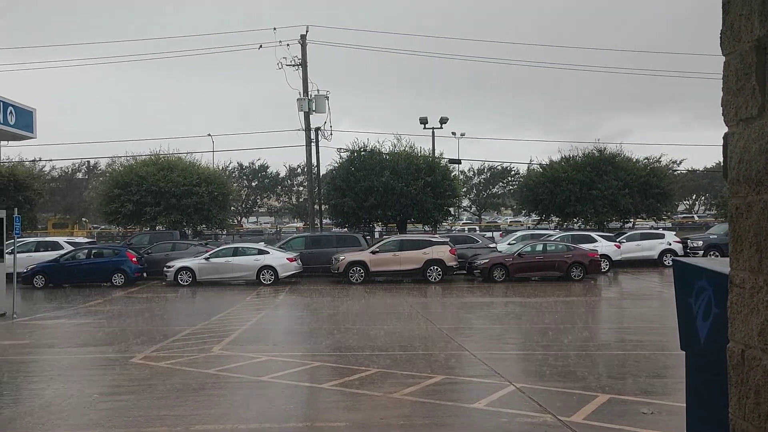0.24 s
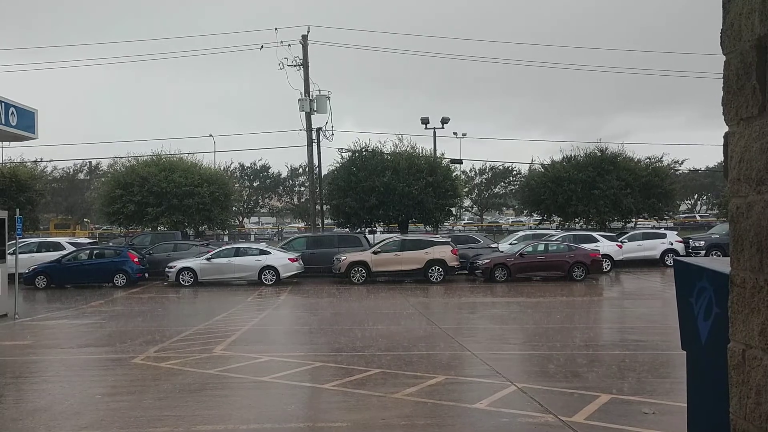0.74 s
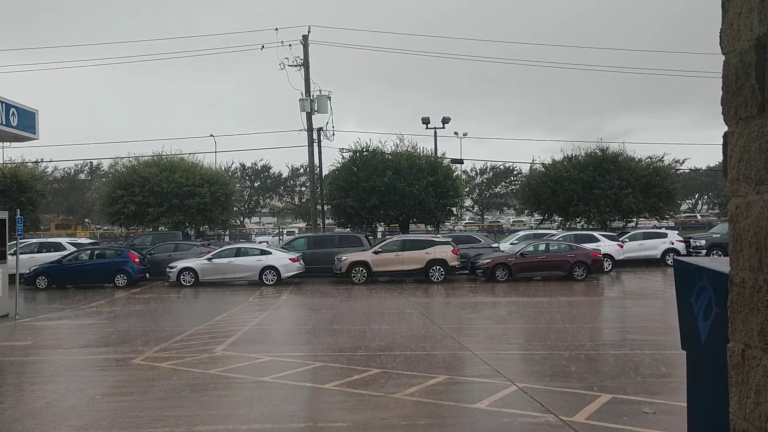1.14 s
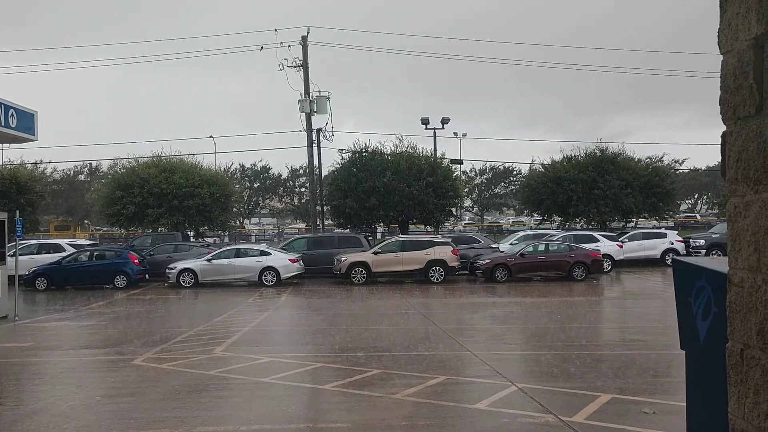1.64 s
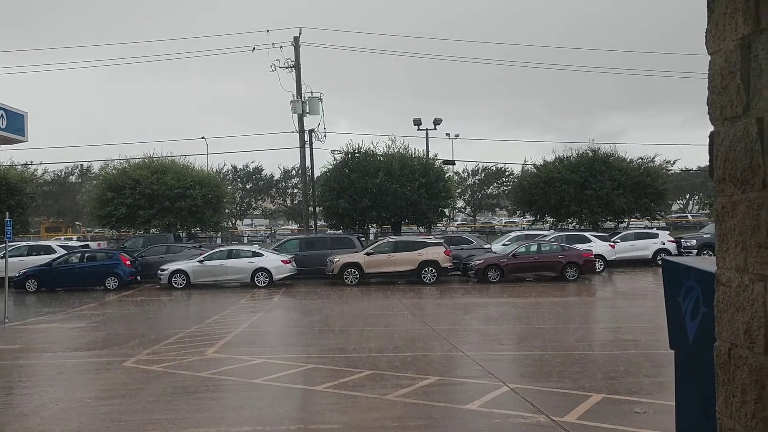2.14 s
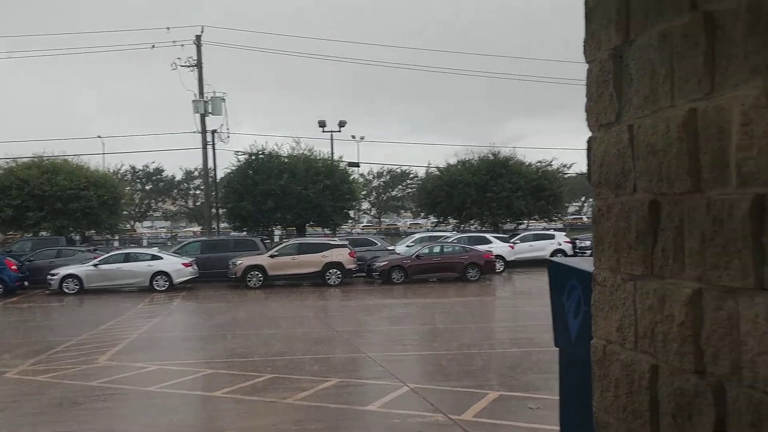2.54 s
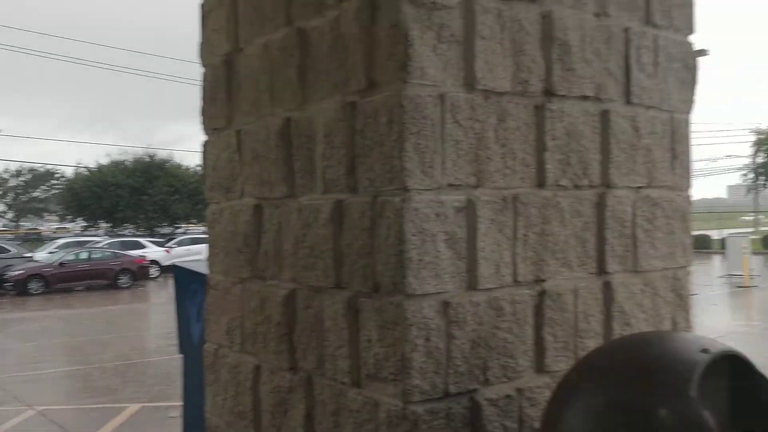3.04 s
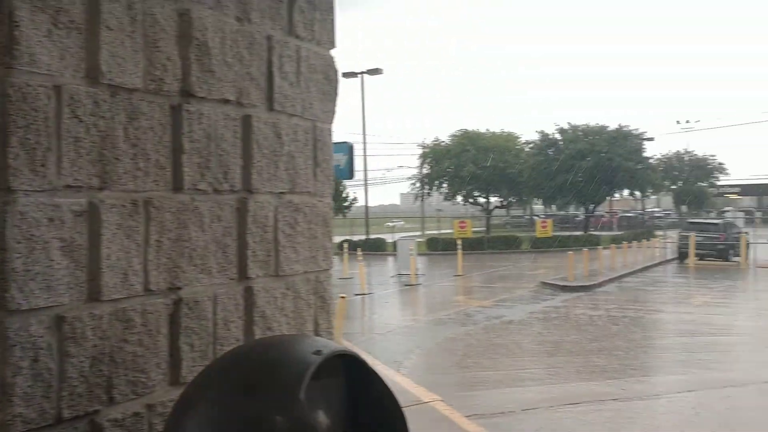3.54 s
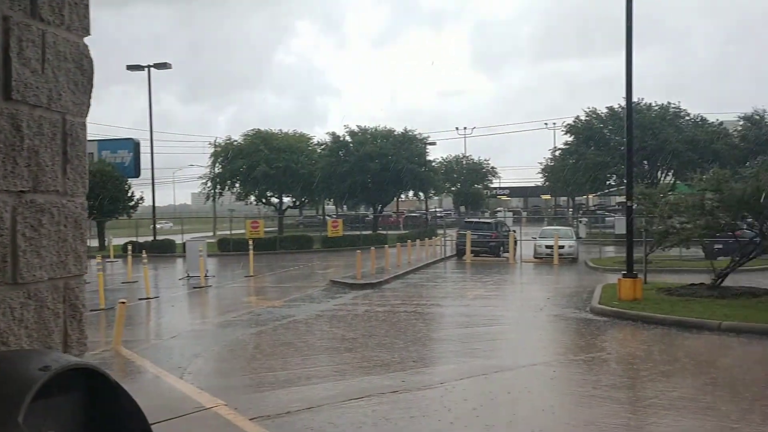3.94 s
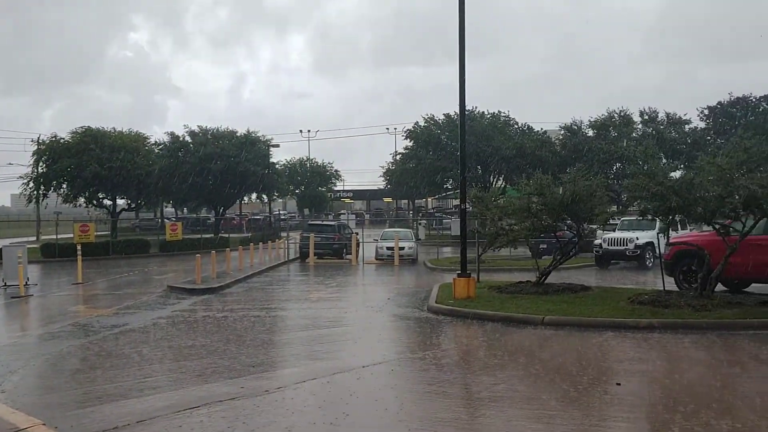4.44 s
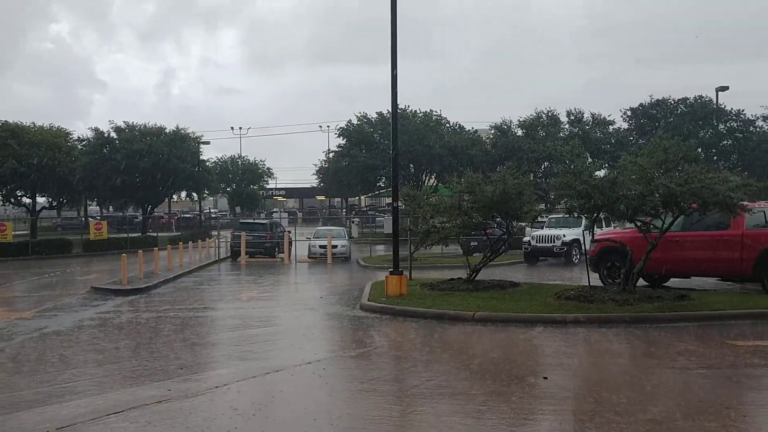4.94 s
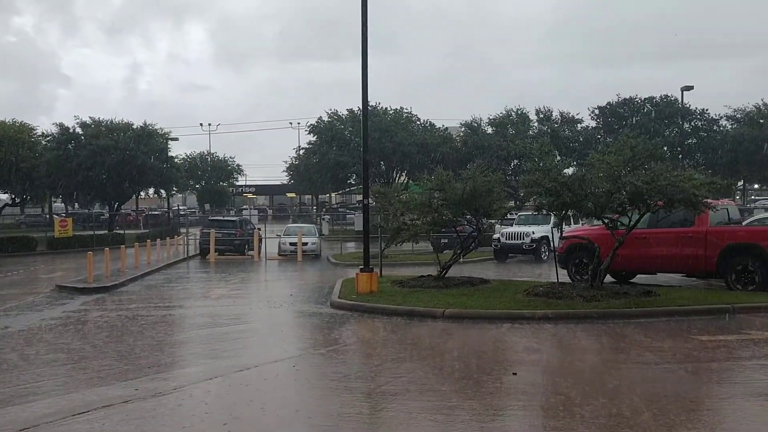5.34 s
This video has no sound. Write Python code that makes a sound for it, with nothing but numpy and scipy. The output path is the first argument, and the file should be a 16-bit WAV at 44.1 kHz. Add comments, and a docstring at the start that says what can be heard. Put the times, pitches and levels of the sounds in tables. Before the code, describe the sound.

Rain on an open parking lot: a crisp, grainy hiss, close drops cracking, puddle splatter, faint traffic murmur and wind buffeting the microphone.

```python
"""Rain on a wet parking lot, heard on two microphone ports beside a brick pillar as the microphone turns.
From the start: ticking drops over a wash of noise, runoff slapping into a puddle and pattering on concrete
at right, a traffic murmur far off, and gusts of low noise that thump and ruffle the left port.
Soon drops shatter, bubbles ring, large drops crack close by and gushes slap the ground. The early rain
comes in even waves; after about three seconds ticks stand out, the hiss brightens and the whirrs fade."""
import sys
import numpy as np
from scipy import signal
from scipy.fft import rfft, irfft
from scipy.io import wavfile
from scipy.ndimage import uniform_filter1d

SR = 44100
rng = np.random.default_rng(int(sys.argv[2]) if len(sys.argv) > 2 else 0)


def generate_wav(signal):
    """Clip the signal to [-1, 1] and save it as 16-bit WAV at the path in sys.argv[1]."""
    frames = np.transpose(np.atleast_2d(signal))
    scaled = np.clip(frames, -1, 1) * 32767
    pcm = np.round(scaled).astype(np.int16)
    wavfile.write(sys.argv[1], SR, pcm)


N = 246519
TIME = np.arange(N) / SR


def amp(db):
    """Amplitude ratio of a level in dB."""
    return 10 ** (np.asarray(db) / 20)


def unit(x):
    """Scales a sound to rms 1."""
    return x / np.sqrt(np.mean(x ** 2) + 1e-20)


def curve(rows):
    """A table of (time, value) rows, joined by straight lines at every sample."""
    return np.interp(TIME, *np.transpose(rows))


def read(points, hz):
    """A spectrum, joined by straight lines on a log-frequency axis."""
    f, db = np.transpose(points)
    return np.interp(np.log(hz + 1), np.log(f), db)


def colour(x, points, size=4096):
    """Causal minimum-phase filter with the given spectrum, so that clicks keep their sharp front."""
    log_gain = np.log(amp(read(points, abs(np.fft.fftfreq(size, 1 / SR)))))
    response = np.exp(np.conj(signal.hilbert(log_gain)))
    taps = np.fft.ifft(response).real
    return signal.oaconvolve(x, taps[:size // 2])[:N]


def band(hz, width_hz):
    """Noise of rms 1 in a bell-shaped band; around 0 Hz it is a slow random drift."""
    f = np.fft.rfftfreq(N, 1 / SR)
    bell = np.exp(-2 * ((f - hz) / width_hz) ** 2)
    return unit(irfft(rfft(rng.standard_normal(N)) * bell, N))


def impacts(per_s, spread_db, limit_db):
    """Random clicks of either sign: many small, a few large."""
    size = amp(np.minimum(spread_db * rng.exponential(1, N), limit_db))
    sign = rng.choice([-1, 1], N)
    return size * sign * (rng.random(N) < per_s / SR)


def tick(hz, cycles, size=96):
    """The sub-millisecond pressure ring of a drop bursting on wet ground."""
    turns = hz * np.arange(size) / SR
    ring = np.sin(2 * np.pi * turns) * turns * np.exp(-turns / cycles)
    return ring / np.linalg.norm(ring)


def add(mix, s, sound):
    """Lays a short two-sided sound into the mix at s seconds."""
    part = mix[:, max(round(s * SR), 0):][:, :sound.shape[1]]
    part += sound[:, :part.shape[1]]


def spray(clicks, t60, size=4000):
    """Each impact starts a fizz of droplets and wall reflections, down 60 dB after t60 seconds."""
    decay = np.exp(-2 * np.log(1000) * np.arange(size) / SR / t60)
    power = signal.oaconvolve(clicks ** 2, decay / decay.sum())[:N]
    return np.sqrt(abs(power)) * rng.standard_normal(N)


def steadied(x, size=1500):
    """Evens out the level over a few hundredths of a second, leaving the fine grain."""
    return x / np.sqrt(abs(uniform_filter1d(x ** 2, size)) + 1e-12)


def patchy(x, depth_db, length_s, width_hz, ceiling=1.24, size=1024):
    """Lets neighbouring pitches swell and fade on their own, in short random patches."""
    z = signal.stft(x, nperseg=size, noverlap=size * 3 // 4)[2]
    # a random field over pitch and time, smoothed along both
    rate = np.fft.fftfreq(z.shape[1], size / 4 / SR)
    ripple = np.fft.fftfreq(z.shape[0], SR / size)[:, None]
    smooth = np.exp(-2 * ((rate * length_s) ** 2 + (ripple * width_hz) ** 2))
    field = unit(np.fft.ifft2(np.fft.fft2(rng.standard_normal(z.shape)) * smooth).real)
    # the ceiling makes the fades deeper than the swells
    z = z * unit(amp(depth_db * np.minimum(field, ceiling)))
    return signal.istft(z, nperseg=size, noverlap=size * 3 // 4)[1][:N]


WAVE_CREST_S, WAVE_PERIOD_S = .68, .372
WAVES_END_S, WAVES_FADE_S = 2.5, 0.23


def waves():
    """Sheets of rain come and go between -1 and 1, then even out."""
    swing = np.cos(2 * np.pi * (TIME - WAVE_CREST_S) / WAVE_PERIOD_S)
    return swing * np.clip((WAVES_END_S - TIME) / WAVES_FADE_S, 0, 1)


# colour of the rain on the left port: frequency_hz, relative_level_db
RAIN_COLOUR_LEFT = [(1000, -86), (4200, -32), (4900, -45), (5500, -39), (6300, -27), (8000, -1.5),
                    (10000, 2), (12500, 0), (15500, -7)]
# colour of the rain on the right port: frequency_hz, relative_level_db
RAIN_COLOUR_RIGHT = [(1000, -29.5), (2800, -77), (4700, -43), (5550, -17.5), (6300, -10), (8000, -5),
                     (10000, -0.5), (12500, -1), (15500, -2)]
# the rain grows louder as the microphone turns: time_s, relative_level_db
RAIN_LEVEL = [(0, -27), (.47, -26.5), (.56, -27.5), (.66, -26), (1.25, -26), (2.02, -25), (2.18, -25),
              (2.3, -26), (2.38, -23.5), (2.65, -22.5), (2.85, -24), (3.34, -23.5), (3.41, -25.5),
              (3.55, -24.5), (4.1, -22.5), (4.55, -22.5), (5.0, -24.5), (5.38, -22.5), (5.59, -23.5)]
WAVE_RAIN_DB = 0.35  # swing of the waves either way


def rain(spectrum, level_db, count=16):
    """Separate ticks from nearby pavement over the smooth wash of the far lot."""
    flurry = amp(.7 * band(0, 22))
    drops_per_s = 230 * flurry  # at each pitch
    ticks = np.zeros(N)
    for hz in np.geomspace(5500, 16500, count):
        clicks = impacts(drops_per_s, spread_db=4.2, limit_db=16)
        ticks += np.convolve(clicks, tick(hz, cycles=.6))[:N]
    ticks = unit(ticks)
    # the turn brings closer pavement into earshot, so single ticks stand out more
    near_share = np.interp(TIME, [2, 3.5], [.27, .4])
    wash = unit(spray(ticks, t60=.03) + flurry * rng.standard_normal(N))
    sound = np.sqrt(near_share) * ticks + np.sqrt(1 - near_share) * wash
    sound = patchy(colour(sound, spectrum), depth_db=1.8, length_s=.025, width_hz=420)
    return unit(sound) * amp(curve(RAIN_LEVEL) + WAVE_RAIN_DB * waves() + level_db)


def turned(x):
    """Facing the open lot after the turn, the top of the hiss is brighter."""
    top = signal.sosfilt(signal.butter(1, 11000, "high", fs=SR, output="sos"), x)
    shade_db = np.interp(TIME, [2.7, 3.5], [-2.5, 1.2])
    brightened = x + (amp(shade_db) - 1) * top
    return brightened * amp(-.55 * shade_db)  # offsets the change in level


# colour of the splatter on the left port: frequency_hz, relative_level_db
SPLATTER_LEFT = [(1000, -46), (3000, -20), (4200, -18.5), (5200, -8), (5650, -2), (6200, 9.5), (7000, 5),
                 (9000, -7), (12000, -21)]
# colour of the splatter on the right port: frequency_hz, relative_level_db
SPLATTER_RIGHT = [(1000, -33), (2300, -14), (2900, -15), (3180, -0.5), (3420, -3), (3750, 3.5),
                  (4300, -0.5), (4750, -3), (5250, 6.5), (5580, -6), (6200, -2.5), (7000, 2.5), (8000, 0),
                  (12000, -4)]
# flow of the runoff into the puddle on the right: time_s, relative_level_db
RUNOFF_LEVEL = [(0, -44.5), (.07, -44.5), (.55, -42), (.88, -39), (1.2, -47), (1.4, -44.5), (1.62, -44),
                (1.74, -39), (2.05, -45), (2.33, -42), (2.45, -38), (2.62, -40), (2.8, -39), (3.02, -43.5),
                (3.35, -47), (3.58, -54.5), (3.8, -46), (4.05, -47.5), (4.38, -53.5), (4.6, -48),
                (5.1, -56.5), (5.43, -44.5), (5.59, -54)]


def splatter(spectrum, flow_db, count=60):
    """A dense stream of small slaps on a puddle, with bubbles ringing at many pitches."""
    t = np.arange(SR // 12) / SR
    bubbles = np.zeros(N)
    for hz in np.geomspace(2700, 7800, count):
        ring = np.sin(2 * np.pi * hz * t * (1 + .1 * t)) * np.exp(-hz * t / 20)
        bubbles += signal.oaconvolve(impacts(24, spread_db=4, limit_db=10), ring)[:N]
    slaps = impacts(600, spread_db=5, limit_db=14)
    sound = .35 * unit(bubbles) + unit(slaps) + .5 * unit(spray(slaps, t60=.012))
    sound = patchy(sound, depth_db=5, length_s=.04, width_hz=200, ceiling=1.2)
    return steadied(colour(sound, spectrum)) * amp(flow_db)


# colour of the thin spatter of runoff on bare concrete: frequency_hz, relative_level_db
SPATTER_COLOUR = [(2500, -45), (4000, -15), (4700, -9), (5150, 0), (5550, -5), (6000, 2.5), (6600, -3),
                  (7500, -13), (10000, -29)]
# level of that spatter on the right: time_s, level_db
SPATTER_LEVEL = [(0, -56), (.07, -39.5), (.6, -39.5), (.95, -53), (1.4, -72), (1.75, -51), (2.05, -59),
                 (2.17, -36.5), (2.32, -41), (2.45, -34), (2.92, -35), (3.08, -40.5), (3.4, -35.5),
                 (3.58, -48), (3.95, -42), (4.2, -42), (4.6, -56), (5.25, -45.5), (5.5, -61)]


def spatter():
    """Part of the runoff misses the puddle and patters thinly on concrete, louder on the right."""
    slaps = impacts(1200, spread_db=4, limit_db=12)
    sound = unit(slaps) + .6 * unit(spray(slaps, t60=.012))
    right = steadied(colour(sound, SPATTER_COLOUR))
    left = amp(-20) * np.roll(right, SR // 50)  # arrives late, off the wall
    return np.array([left, right]) * amp(curve(SPATTER_LEVEL))


def uneven_below(x, edge_hz=6600):
    """Makes all the water noise below 6.6 kHz uneven, in narrow random patches."""
    low = signal.oaconvolve(x, signal.firwin(61, edge_hz, fs=SR), "same")
    return x - low + patchy(low, depth_db=12, length_s=.075, width_hz=145, ceiling=.75)


# distant traffic on the left port: frequency_hz, relative_level_db (per Hz)
TRAFFIC_LEFT = [(30, -70), (110, -102), (250, -68), (400, -82), (520, -88.5), (700, -72.5), (930, -82.5),
                (1050, -83), (1200, -89.5), (1500, -93), (2400, -88.5), (2700, -80), (3200, -99),
                (8000, -102)]
# distant traffic on the right port: frequency_hz, relative_level_db (per Hz)
TRAFFIC_RIGHT = [(30, -100), (100, -71), (240, -79.5), (340, -83), (430, -70), (530, -81), (620, -80),
                 (740, -69.5), (880, -69.5), (1020, -92), (1280, -83.5), (1500, -89), (2100, -92),
                 (8000, -102)]
# the traffic swells and recedes: time_s, relative_level_db
TRAFFIC_LEVEL = [(0, -0.5), (.9, 4), (3.7, 3.5), (5.59, 2)]
# narrow whirring resonances in the traffic noise, before dips and fade: pitch_hz, width_hz, left_db, right_db
WHIRRS = [(1778, 86, -102, -59.5), (2640, 78, -93, -66.5)]
# faint low drones that come and go: start_s, length_s, pitch_hz, width_hz, level_db
DRONES = [(3.811, 0.12, 430, 130, -42), (3.917, 0.31, 378, 187, -42.5), (4.28, 0.51, 308, 128, -44.5),
          (5.246, 0.24, 605, 45.5, -48.5)]
WHIRR_DIP_DB = 7.5  # per unit of a random drift


def traffic():
    """A dull, shifting noise murmur, partly alike in both ports, with whirring resonances and drones."""
    shared_colour = [(150, -13.5), (350, 9.5), (600, -6.5), (1000, -4.5), (3000, -51.0)]
    shared = colour(rng.standard_normal(N), shared_colour)
    sides = []
    for spectrum in (TRAFFIC_LEFT, TRAFFIC_RIGHT):
        murmur = colour(1.72 * shared + rng.standard_normal(N), spectrum)
        sides.append(patchy(murmur, depth_db=8.0, length_s=0.046, width_hz=159, ceiling=1.55))
    # the square root turns dB per Hz into the level of sampled noise
    out = np.array(sides) * np.sqrt(SR / 2) * amp(curve(TRAFFIC_LEVEL) - 8.5)
    # the whirrs fade as the microphone turns away
    facing = amp(np.interp(TIME, [2.8, 4.2], [0, -3.2]))
    for hz, width_hz, left_db, right_db in WHIRRS:
        whirr = amp([[left_db], [right_db]]) * band(hz, width_hz)
        dips = amp(WHIRR_DIP_DB * np.minimum(band(0, 8.6), .3))
        out += whirr * dips * facing
    for s, length, hz, width_hz, db in DRONES:
        swell = np.sin(np.pi * np.clip((TIME - s) / length, 0, 1))
        out += amp(db) * band(hz, width_hz) * swell
    return out


# gusts of wind on the two ports: start_s, length_s, relative_left_db, relative_right_db
GUSTS = [(0.034, 0.16, -36, -77), (0.41, 0.072, -43, -62), (0.61, 0.012, -38.5, -60),
         (0.723, 0.023, -40, -76), (0.816, 0.028, -37.5, -77), (1.22, 0.27, -35, -74),
         (1.623, 0.03, -27, -49), (1.877, 0.13, -33.5, -69), (2.11, 0.11, -28, -66), (2.4, 0.23, -37, -73),
         (3.191, 0.33, -34.5, -57), (3.487, 0.21, -38, -37.5), (3.856, 0.36, -46, -50.5),
         (4.466, 0.15, -40, -50), (4.758, 0.28, -39.5, -52), (5.143, 0.083, -34, -42.5),
         (5.432, 0.1, -28, -53)]
GUST_RISE_S, GUST_RELEASE_S = 0.029, 0.079  # time constants
GUST_SAG_DB_PER_S = 1
BREEZE_DB = (-56.5, -84)  # relative level between gusts: left, right
# turbulence around each thump: left and right against its tabled peak, and its half-length
WAKE_DB, WAKE_S = (-11.5, -54), 0.0088


def pressure_db(port):
    """Each gust rises quickly, sags and dies back into the breeze; eddies add brief peaks."""
    power = amp(BREEZE_DB[port]) ** 2
    for s, length, *sides_db in GUSTS:
        age = TIME - s
        rise = np.minimum(age, 0) / GUST_RISE_S
        release = np.maximum(age - length, 0) / GUST_RELEASE_S
        gate = np.exp(rise - release)
        sag_db = GUST_SAG_DB_PER_S * np.maximum(age, 0)
        power = power + (gate * amp(sides_db[port] - sag_db)) ** 2
    for s, db in THUMPS:
        wake = np.exp(-((TIME - s) / WAKE_S) ** 2)
        power = power + amp(db + WAKE_DB[port]) ** 2 * wake
    return 10 * np.log10(power)


# colour of the buffeting: frequency_hz, relative_level_db
BUFFET_COLOUR = [(20, -37), (40, -42), (65, 3), (110, 9.5), (170, 3.5), (250, -1), (380, -10.5), (520, -33),
                 (800, -32), (1300, -44.5), (3000, -62)]


def buffet(force_db, level_db, lump_db):
    """Turbulence rumbles on a port: lumpy noise, mostly low, that follows the wind's force."""
    swirl = colour(rng.standard_normal(N) * amp(lump_db * band(0, 36)), BUFFET_COLOUR)
    # the gust sets the overall force; the swirl only varies it from eddy to eddy
    return steadied(swirl, size=2000) * amp(force_db + level_db)


# single eddies that thump on the left port, before a common trim: time_s, peak_db
THUMPS = [(0.068, -16), (0.113, -16.5), (0.166, -18), (0.601, -19), (1.227, -17.5), (1.259, -16.5),
          (1.451, -16), (1.591, -13), (1.648, -18), (1.671, -14), (1.749, -17.5), (1.841, -14),
          (2.075, -16.5), (2.147, -14.5), (2.216, -25), (2.432, -15), (5.171, -21), (5.462, -20.5)]


def thumps():
    """An eddy that hits the port squarely gives one fast-dying push and pull of pressure."""
    out, t = np.zeros((2, N)), np.arange(SR // 25) / SR
    for (s, db), (speed, side) in zip(THUMPS, rng.random((len(THUMPS), 2))):
        turns = (140 + 90 * speed) * t
        push = np.sign(side - .5) * np.sin(2 * np.pi * turns) * turns * np.exp(-turns / 0.58)
        # starts early, so that the push peaks near the listed time
        add(out, s - .004, amp([[db], [db - 44]]) * push / abs(push).max())
    return amp(-3.0) * out


# drops that shatter into a cluster of ticks: start_s, length_s, pitch_hz, relative_left_db, relative_right_db
SPLASHES = [(0.065, .008, 7340, -42, -24.5), (0.676, 0.011, 10800, -23, -18),
            (1.384, 0.0073, 7600, -46, -26), (1.643, .01, 7950, -41, -28), (2.672, 0.0079, 8500, -30, -20),
            (2.926, 0.0074, 7200, -42, -23), (3.506, 0.014, 7400, -42, -24),
            (3.642, 0.016, 7300, -30, -24.5), (3.86, 0.011, 7400, -29, -33),
            (4.089, 0.015, 7440, -33, -23.5), (4.132, 0.011, 7600, -33, -22),
            (4.175, 0.013, 8000, -29, -30), (4.223, 0.013, 6370, -37, -27),
            (4.434, 0.017, 7140, -33, -25.5), (4.54, 0.0088, 7400, -33, -27),
            (4.772, 0.014, 9800, -23, -19), (5.244, 0.011, 8000, -28, -30), (5.48, 0.015, 7200, -28, -24)]
SPLASH_WIDTH = 0.33  # width of a splash's band against its pitch


def splashes():
    """A drop shatters, and its fragments land as a quick cluster of clicks in a bell-shaped band."""
    out, t = np.zeros((2, N)), np.arange(SR // 12) / SR
    f = np.fft.rfftfreq(len(t), 1 / SR)
    for s, length, hz, *sides_db in SPLASHES:
        age = t / (length / 2)
        swell = age * np.exp(1 - age)
        landed = rng.random((2, len(t))) < 9000 / SR
        fragments = rng.standard_normal((2, len(t))) * landed
        bell = np.exp(-2 * ((f - hz) / (SPLASH_WIDTH * hz)) ** 2)
        cluster = irfft(rfft(fragments * swell) * bell, len(t))
        cluster *= np.linalg.norm(swell) / np.linalg.norm(cluster, axis=1, keepdims=True)
        add(out, s, amp(sides_db)[:, None] * cluster)
    return out * amp(-4)


# brief, brighter flutters of hard wind: centre_s, half_length_s, level_db
FLUTTERS = [(0.119, 0.023, -29.5), (0.163, 0.011, -43), (1.44, 0.023, -33), (1.599, 0.018, -29.5),
            (1.647, 0.023, -28), (2.152, 0.019, -31), (2.23, 0.022, -30.5), (3.209, 0.053, -40),
            (3.33, 0.032, -37.5), (5.545, 0.007, -34)]
# colour of that flutter: frequency_hz, relative_level_db
FLUTTER_COLOUR = [(60, -28), (200, -13.5), (300, 15), (430, -1.5), (560, -7), (850, -13), (1300, -22),
                  (3000, -75)]


def flutter():
    """Hard gusts break into a brief, brighter ruffle of noise on the left port."""
    force = sum(amp(db) * np.exp(-((TIME - s) / length) ** 2) for s, length, db in FLUTTERS)
    ruffle = steadied(colour(rng.standard_normal(N), FLUTTER_COLOUR), size=900)
    return np.array([force * ruffle, np.zeros(N)])


# larger drips that ring a bubble in the puddle: start_s, pitch_hz, peak_db, glide_hz_per_s
PLIPS = [(0.156, 3120, -47, 500), (0.552, 3200, -47, -2000), (1.032, 3130, -47, 0),
         (4.439, 3200, -42, -3000), (5.019, 3150, -49, -9000)]


def plips():
    """A drip traps a wobbling bubble that rings softly under the rain, on the right."""
    out, t = np.zeros((2, N)), np.arange(SR // 6) / SR
    for s, hz, db, glide in PLIPS:
        age = t / .014
        wobble = 1 + .04 * band(0, 1400)[:len(t)]
        turns = np.cumsum((hz + glide * t) * wobble) / SR
        ring = age * np.exp(1 - age) * np.sin(2 * np.pi * turns)
        add(out, s, amp([[db - 28], [db]]) * ring)
    return out


# large drops that land close by, before colour and trim: time_s, peak_db, left_minus_right_db, pitch_hz
NEAR_DROPS = [(.189, -9, -9, 12400), (.26, -10, -16, 10000), (.33, -10, -12, 10700), (.628, -8, -9, 8000),
              (.731, -8, -9, 10300), (.795, -11, -12, 9900), (1.545, -10, -11, 11400),
              (1.818, -11, -11, 11500), (2.159, -6, -10, 9900), (2.228, -10, -12, 9500),
              (2.439, -7.5, -12, 8100), (2.662, -6, 0, 10900), (2.926, -7, -14, 8500),
              (3.005, -7, -13, 13400), (3.091, -4, -14, 12800), (3.113, -5, -11, 10900),
              (3.346, -8, -13, 12000), (3.361, -8, -10, 11300), (3.573, -4, -9, 11700),
              (3.694, -7, -11, 12800), (3.952, -5, -12, 12200), (4.016, -5, -8, 10100),
              (4.072, -3, -13, 11900), (4.106, -7, -9, 11200), (4.137, -7, -13, 11500),
              (4.186, -4, -3, 8500), (4.221, -8, -7, 10000), (4.291, -5, -6, 12200), (4.471, -6, -7, 11500),
              (4.49, -6, -13, 12400), (4.544, -7, -9, 9600), (4.717, -4, -7, 13100),
              (4.827, -4, -15, 11300), (5.05, -4, -12, 12500), (5.057, -5, -10, 11900),
              (5.306, -6, -13, 11900), (5.358, -5, -6, 10300)]
# colour of a large drop's crack: frequency_hz, relative_level_db
CRACK_COLOUR = [(1500, -60), (3500, -44), (5000, -22), (6500, -6), (8000, 0), (15000, 0)]
NEAR_DB = -1.3  # common trim
# droplets thrown up by a large drop: level against its peak, time constant of their decay
DROPLETS_DB, DROPLETS_S = -22, .006


def near_drops():
    """Single large drops, each with a pitch of its own and a brief fizz of droplets."""
    out, t = np.zeros((2, N)), np.arange(SR // 25) / SR
    for s, db, pan_db, hz in NEAR_DROPS:
        ring = tick(hz, cycles=.9)
        fizz = signal.lfilter(ring, 1, rng.standard_normal((2, len(t))))
        droplets = fizz * np.exp(-t / DROPLETS_S)
        # only the farther side is turned down
        sides = amp(db + np.array([[min(pan_db, 0)], [min(-pan_db, 0)]]))
        add(out, s, sides * ring / abs(ring).max())
        add(out, s, sides * amp(DROPLETS_DB) * droplets)
    return amp(NEAR_DB) * np.array([colour(side, CRACK_COLOUR) for side in out])


# heavier gushes of runoff hitting the ground: start_s, length_s, left_db, right_db
GUSHES = [(0.612, 0.073, -51, -31.5), (2.137, 0.14, -56, -37.5), (2.42, 0.076, -49, -28),
          (3.128, 0.053, -39, -39), (3.38, 0.043, -34, -31.5), (4.203, 0.033, -49, -41),
          (4.766, 0.046, -47, -32.5)]
# colour of a gush: frequency_hz, relative_level_db
GUSH_COLOUR = [(1500, -50), (2700, -28), (3200, -9), (4500, -1.5), (5500, 0), (7000, 2), (9000, -4),
               (14000, -29)]


def gushes():
    """A lump of water breaks into a quick cluster of wet slaps."""
    swell = np.zeros((2, N))
    for s, length, left_db, right_db in GUSHES:
        age = np.maximum(TIME - s, 0) / (length / 3)
        swell += amp([[left_db], [right_db]]) * age * np.exp(1 - age)
    slaps = [colour(impacts(1500, spread_db=5, limit_db=11), GUSH_COLOUR) for _ in swell]
    return swell * np.array([unit(side) for side in slaps])


def scene():
    """Rain and runoff in front, wind on the ports, traffic behind."""
    hiss = np.array([rain(RAIN_COLOUR_LEFT, level_db=-5.5), rain(RAIN_COLOUR_RIGHT, level_db=2.0)])
    # on the left the splatter follows the rain, on the right the runoff
    puddle_left = splatter(SPLATTER_LEFT, curve(RAIN_LEVEL) - 19)
    puddle_right = splatter(SPLATTER_RIGHT, curve(RUNOFF_LEVEL) + 4.5)
    puddle = np.array([puddle_left, puddle_right])
    ground = turned(hiss) + puddle + spatter() + gushes()
    water = np.array([uneven_below(side) for side in ground])
    wind_left = buffet(pressure_db(port=0), level_db=3.5, lump_db=4)
    wind_right = buffet(pressure_db(port=1), level_db=3.5, lump_db=1)
    wind = np.array([wind_left, wind_right]) + thumps() + flutter()
    return water + traffic() + wind + splashes() + plips() + near_drops()


EDGE_HZ = 15900


def record(dry):
    """The recorder's band limit: a steep low-pass."""
    taps = signal.firwin(701, EDGE_HZ, window=("kaiser", 9), fs=SR)
    return signal.oaconvolve(dry, taps[None], "same", axes=1)


dry = scene()
out = record(dry)
generate_wav(out)
```